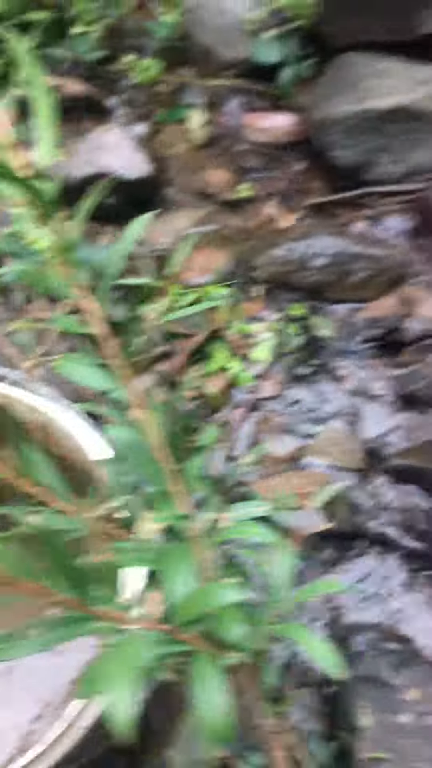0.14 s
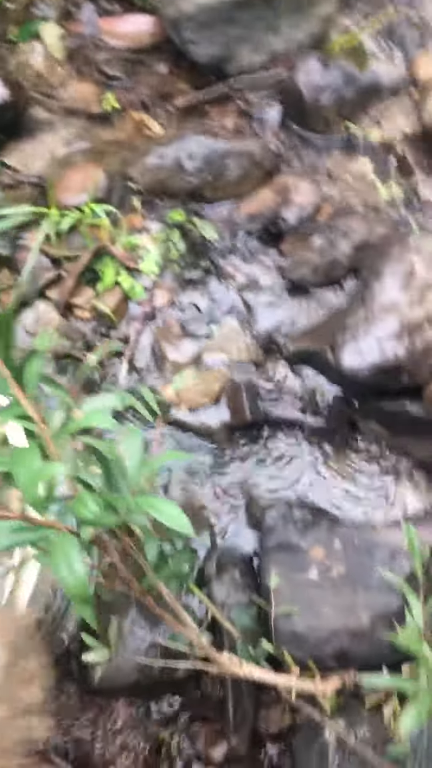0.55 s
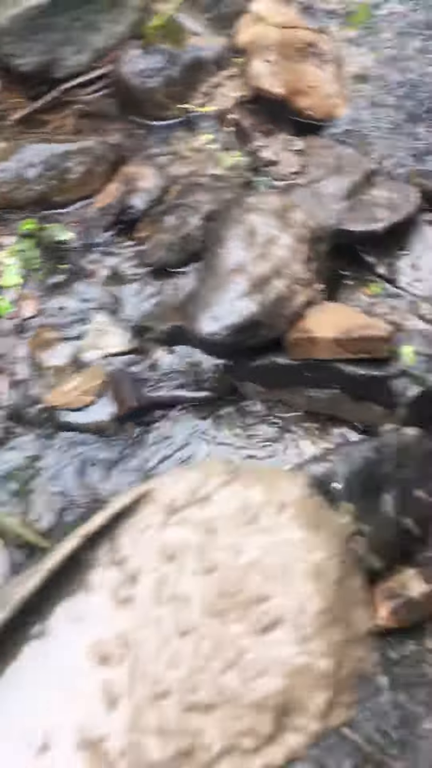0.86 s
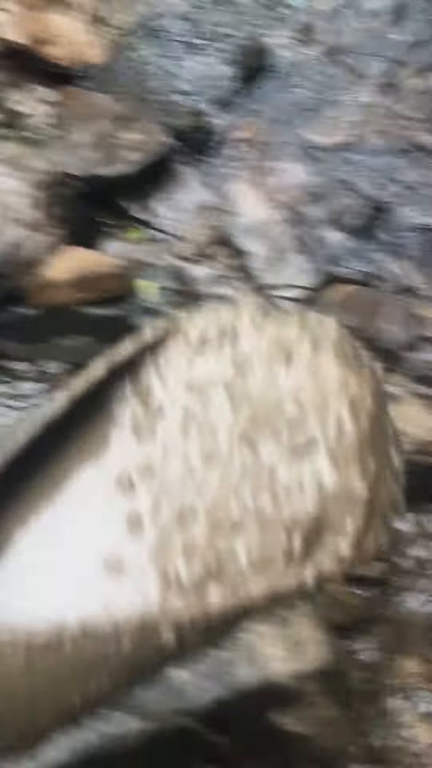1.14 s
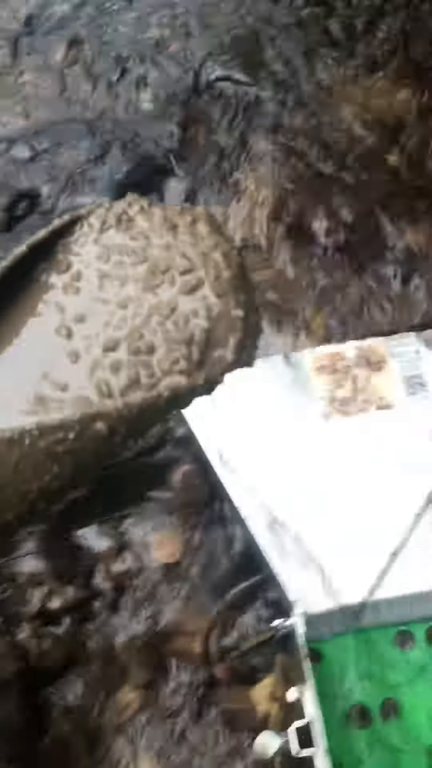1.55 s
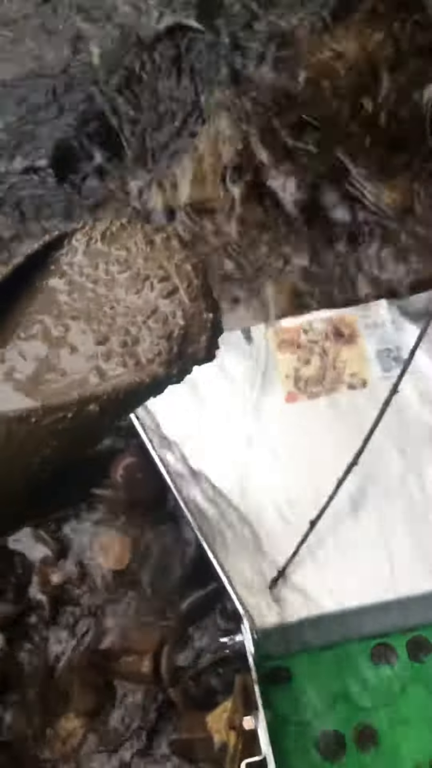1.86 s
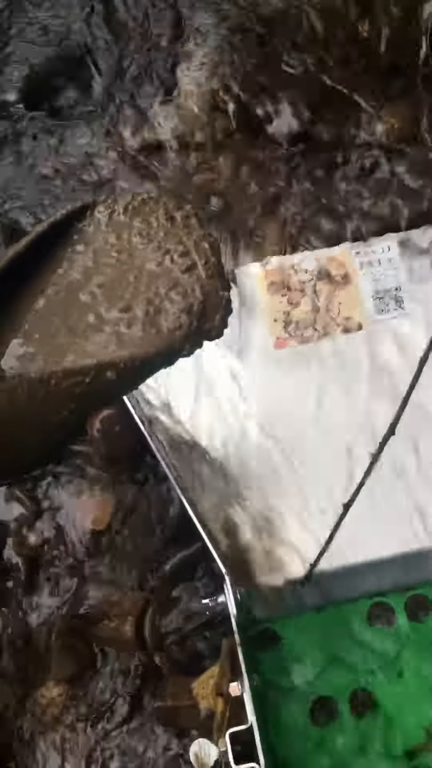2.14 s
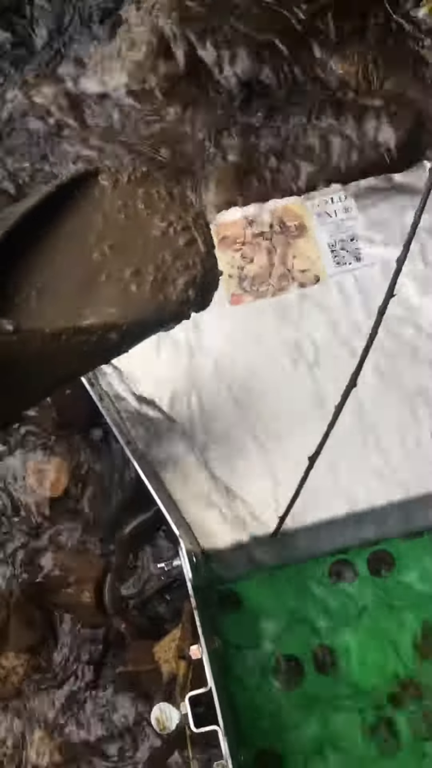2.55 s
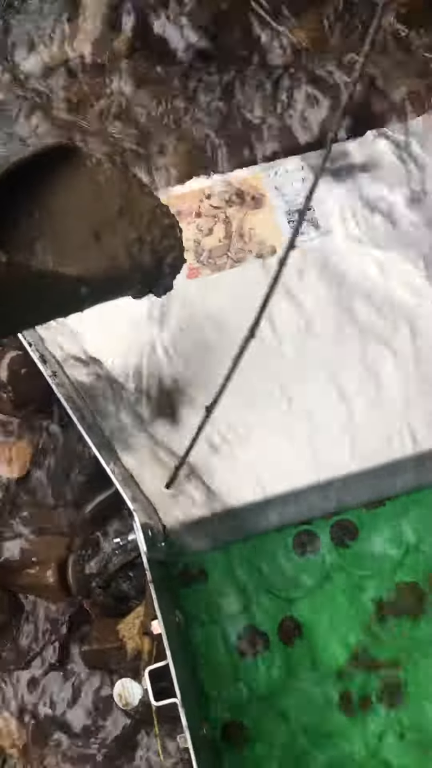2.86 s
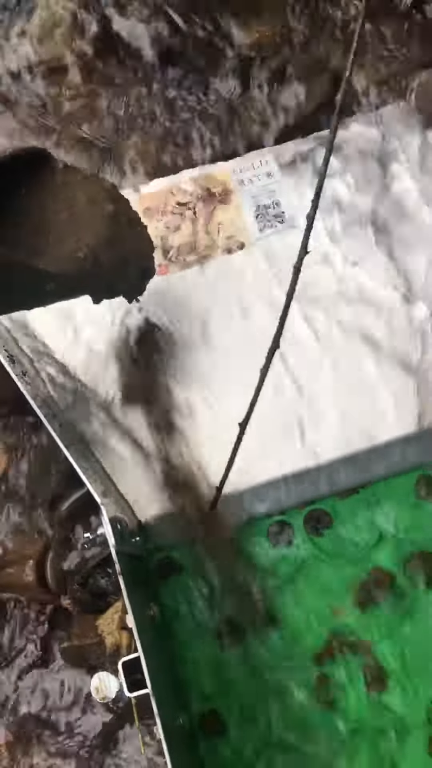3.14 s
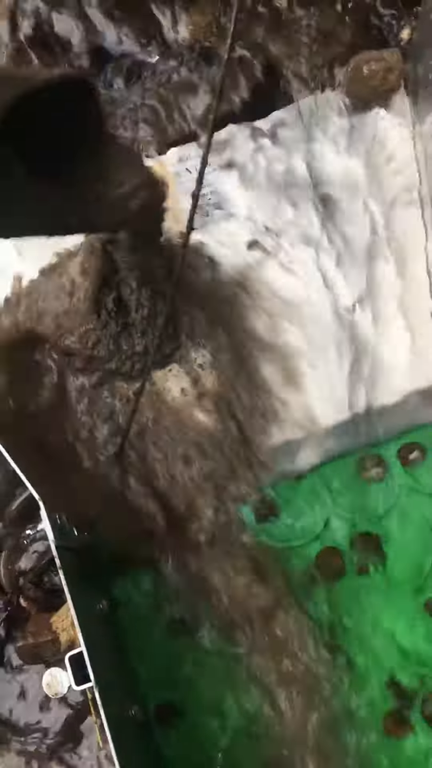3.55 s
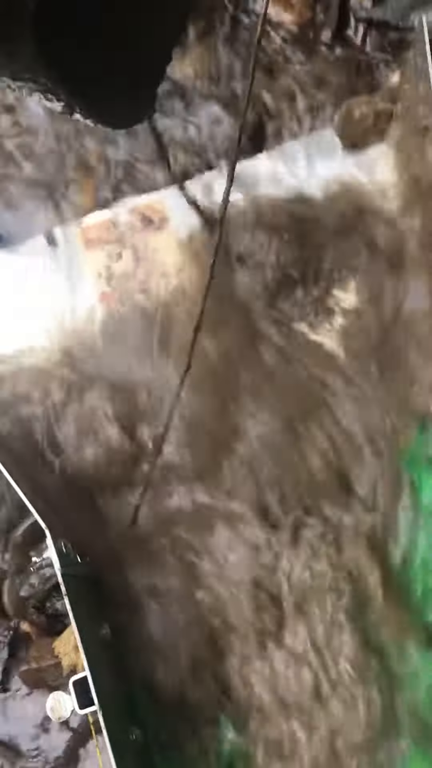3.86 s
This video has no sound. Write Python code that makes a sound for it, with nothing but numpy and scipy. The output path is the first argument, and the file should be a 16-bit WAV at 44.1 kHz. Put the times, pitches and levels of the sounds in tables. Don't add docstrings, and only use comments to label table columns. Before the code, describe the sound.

Close outdoor stream, hissing and gurgling with small splashes, swells gently and drums softly on sheet metal, then two wet loads of mud and grit land in the last half second, heard on a phone.

```python
import sys
import numpy as np
from scipy import signal
from scipy.fft import rfft, irfft, next_fast_len
from scipy.io import wavfile
from scipy.ndimage import uniform_filter1d, map_coordinates

SR = 44100
rng = np.random.default_rng(int(sys.argv[2]) if len(sys.argv) > 2 else 0)


def ratio_of_db(decibels):
    return 10 ** (np.asarray(decibels, float) / 20)


def materialize(psi):
    bounded = np.clip(np.atleast_2d(psi).T, -1, 1)
    quanta = np.round(bounded * 32767).astype(np.int16)
    wavfile.write(sys.argv[1], SR, quanta)


N = 176400

# (time [s], level [dB])
CLOSENESS = [
    (0, -49),
    (.8, -47.5),
    (2, -45),
    (3.2, -45),
    (4, -44.5),
]
# (time [s], level [dB])
POUR_STRENGTH = [
    (3.0, -42),
    (3.4, -42),
    (3.48, -31),
    (3.58, -38),
    (3.765, -41.5),
    (3.79, -34),
    (3.89, -33.5),
    (3.91, -41),
    (4, -36.5),
]
# (time [s], peak level [dB], brightness [Hz])
SPLASHES = [(0.0258, -29, 14500), (0.0752, -29, 7780), (0.2104, -21, 6590), (0.2528, -32, 11800),
            (0.3296, -28, 6360), (0.5043, -27, 15400), (0.5237, -29, 14600), (0.5442, -29, 11800),
            (0.611, -26, 9420), (0.621, -27, 14600), (0.7662, -30, 14800), (0.7916, -27, 6420),
            (0.8155, -9, 15300), (0.9183, -26, 12500), (0.9308, -21, 10000), (1.0735, -23, 12100),
            (1.2945, -28, 11400), (1.3099, -29, 8770), (1.3254, -23, 9660), (1.4576, -28, 8590),
            (1.4955, -25, 9150), (1.5549, -27, 12600), (1.6117, -25, 9380), (1.6272, -16, 14900),
            (1.6781, -25, 9740), (1.7674, -23, 12500), (1.8058, -26, 13100), (1.8337, -18, 13800),
            (1.8547, -25, 11300), (1.8866, -25, 12700), (2.0842, -24, 14700), (2.1545, -26, 14500),
            (2.176, -22, 14200), (2.2323, -24, 6730), (2.2488, -24, 14700), (2.3356, -26, 15100),
            (2.4917, -24, 15300), (2.5421, -27, 13100), (2.5701, -18, 15000), (2.605, -23, 8700),
            (2.6254, -16, 11000), (2.6813, -23, 8810), (2.6993, -25, 8820), (2.7222, -22, 15400),
            (2.7666, -22, 14800), (2.9248, -19, 11100), (2.9791, -25, 13500), (3.0799, -27, 14600),
            (3.1273, -21, 14700), (3.1434, -19, 14100), (3.2625, -21, 15100), (3.3009, -23, 9920),
            (3.3374, -18, 15300), (3.3667, -21, 11400)]
# (time [s], peak level [dB], brightness [Hz])
SPRAYS = [(1.3394, -31, 11000), (3.1931, -18, 9910), (3.2161, -25, 12200), (3.2331, -24, 8140),
          (3.3433, -18, 10900), (3.4316, -21, 10800), (3.5394, -15, 12900), (3.8053, -13, 9510),
          (3.8174, -14, 12500), (3.8754, -15, 8590), (3.8884, -15, 9280), (3.931, -15, 12800)]
# (time [s], peak level [dB], brightness [Hz])
SLAPS = [
    (0.212, -24.5, 1540),
    (0.254, -26, 1220),
    (1.556, -23, 2970),
    (3.504, -15, 1090),
    (3.858, -42, 2840),
]
# (time [s], peak level [dB], brightness [Hz])
GRIT = [(3.4725, -16, 14300), (3.5039, -7, 6680), (3.5804, -24, 14800), (3.5987, -21, 14300),
        (3.6097, -18, 6680), (3.6386, -25, 8440), (3.6591, -21, 15000), (3.7074, -19, 14000),
        (3.7299, -21, 14400), (3.7798, -3, 11400), (3.7874, -13, 9000), (3.8521, -14, 15000),
        (3.8676, -11, 12500), (3.9414, -21, 11100), (3.9494, -23, 14100), (3.9659, -17, 13700),
        (3.9853, -16, 14100)]
# (time [s], peak level [dB], pitch [Hz])
BUBBLES = [(0.214, -27, 1444), (0.254, -36.5, 1286), (0.372, -29, 2110), (0.436, -37, 1310),
           (0.459, -34, 1234), (0.679, -31.5, 2430), (0.818, -32, 1910), (0.875, -29, 3900),
           (0.916, -35, 2600), (0.961, -32, 3250), (1.3, -37, 815), (1.421, -31.5, 2340),
           (1.555, -33, 2380), (1.684, -34.5, 4100), (1.818, -36, 1110), (1.858, -38, 970),
           (2.047, -31, 2870), (2.135, -53, 1770), (2.26, -33, 980), (2.342, -29.5, 1424),
           (2.395, -33.5, 1080)]
# (time [s], peak level [dB], pitch [Hz])
LATE_BUBBLES = [(2.637, -28.5, 2700), (2.667, -34, 1340), (2.7, -35, 1020), (2.724, -28.5, 1445),
                (2.772, -34, 1046), (2.915, -30.5, 2180), (2.979, -37, 1350), (2.997, -30, 1083),
                (3.046, -32, 1520), (3.181, -30.5, 3640), (3.321, -28, 2260), (3.364, -28.5, 3400),
                (3.447, -37, 980), (3.475, -34, 2620), (3.494, -15.5, 2130), (3.625, -35, 1080),
                (3.712, -24, 2640), (3.967, -26, 2190)]
# (time [s], peak level [dB], pitch [Hz])
GURGLES = [(0.584, -40, 738), (0.879, -38, 1410), (1.267, -36, 1730), (1.332, -38, 1290),
           (1.715, -36, 1280), (2.031, -37, 1070), (2.07, -37, 1430), (2.19, -37, 1520), (2.926, -34, 1490),
           (3.205, -34, 1420), (3.275, -35, 1430), (3.658, -34, 1900), (3.854, -30, 1980)]
# (time [s], peak level [dB], pitch [Hz])
PLINKS = [(0.0483, -37, 3290), (0.1411, -38, 3640), (0.1595, -32, 5880), (0.2907, -35, 4610),
          (0.5237, -36, 4610), (0.7158, -35, 4170), (1.0635, -36, 2950), (1.1393, -36, 3570),
          (1.3194, -34, 3290), (1.7135, -35, 5800), (2.1929, -32, 6340), (2.3007, -33, 4240),
          (2.5247, -36, 3100), (2.6983, -30, 4010), (2.7192, -28, 5140), (2.7676, -34, 5680),
          (2.806, -32, 3220), (2.837, -32, 4680), (2.9253, -30, 3660), (2.9577, -31, 3450),
          (3.0804, -29, 3630), (3.1278, -34, 5120), (3.9964, -23, 3810)]
# (time [s], peak level [dB], pitch [Hz])
KNOCKS = [(1.502, -40, 456), (1.857, -37, 460), (2.417, -35.5, 502), (2.823, -36, 510), (3.21, -35.5, 511),
          (3.241, -31, 482), (3.339, -36.5, 460), (3.506, -30.5, 434), (3.564, -35, 390),
          (3.706, -34.5, 248), (3.71, -38, 385), (3.784, -28, 242), (3.79, -36, 364), (3.847, -34, 257)]
# (frequency [Hz], level per Hz [dB])
HISS_COLOUR = [(180, -16), (300, -2.5), (522, 0.5), (700, -3), (2320, -8), (5020, -7.5), (14700, -9),
               (15700, 0.5), (16500, -55)]
# (frequency [Hz], level per Hz [dB])
MUD_COLOUR = [(180, -61), (300, -24), (386, -9), (2740, -2), (4850, -6.5), (14700, -2), (15700, -6),
              (16500, -31)]
# (frequency [Hz], level per Hz [dB])
RUMBLE_COLOUR = [(12, -50), (20, -26), (32, -12.5), (75, -0.5), (92, 0), (113, -11.5), (200, -12),
                 (260, -23), (440, -120)]
# (frequency [Hz], width [Hz], level [dB])
PLATE_TONES = [(238, 48, 0), (505, 85, 0)]
# (frequency [Hz], time to fade 60 dB [s])
BANK_FADE = [(300, 0.08), (3000, 0.08), (12000, 0.007)]
# (frequency [Hz], width [Hz], depth [0-1])
CASE_DIPS = [(4930, 264, 0.37), (10420, 220, 0.68)]


def unit(x):
    return x / np.sqrt(np.mean(x ** 2) + 1e-20)


def along(points, hz):
    f, value = np.transpose(points)
    return np.interp(np.log(hz + 1), np.log(f + 1), value)


def curve(rows):
    return np.interp(np.arange(N) / SR, *np.transpose(rows))


def wobble(rate):
    return map_coordinates(rng.standard_normal(N // 100), [np.arange(N) * rate / SR])


def filtered(x, response):
    size = next_fast_len(len(x) + 4096)
    hz = np.fft.rfftfreq(size, 1 / SR)
    return irfft(rfft(x, size) * response(hz), size)[:len(x)]


def peak(f, hz, width):
    return 1j * f * width / (hz * hz - f * f + 1j * f * width)


def rush(spectrum, patchy_db):
    z = signal.stft(rng.standard_normal(N), nperseg=256)[2]
    patches = uniform_filter1d(rng.standard_normal(z.shape), 8, 0)
    patches = unit(uniform_filter1d(patches, 5, 1))
    x = signal.istft(z * ratio_of_db(patchy_db * patches), nperseg=256)[1][:N]
    return unit(filtered(x, lambda hz: ratio_of_db(along(spectrum, hz))))


def rings(s, gain, hz, cycles, rise, soft, size):
    life = np.arange(size) / SR * (hz / cycles)[:, None]
    turns = np.reshape(cycles, (-1, 1)) * life * (1 + rise * life)
    wave = np.sin(2 * np.pi * turns) * ratio_of_db(-60 * life) * (1 - np.exp(-life / soft))
    wave *= (gain / np.abs(wave).max(1))[:, None]
    at = np.round(s * SR).astype(int)[:, None] + np.arange(size)
    return np.bincount(at.ravel(), wave.ravel(), N + SR)[:N]


def swarm(hz, octaves, cycles, spread_db, rise, soft, clump_db, count, size, around=None):
    r = rng.random((count, 3))
    pitch = np.clip(hz * 2 ** (octaves * rng.standard_normal(count)), hz / 2.6, 15500)
    s = r[:, 0] * (N - 1) / SR
    clump = np.clip(wobble(40), -2, 2)[(s * SR).astype(int)]
    db = -spread_db * np.log(r[:, 1] + .03) + clump_db * clump
    if around:
        at = np.array(around)[(r[:, 2] * len(around)).astype(int), 0]
        s = at + 0.012 * (rng.gamma(2, size=count) - 1.5)
    return unit(rings(s, ratio_of_db(db), pitch, cycles * (0.75 + r[:, 2]), rise, soft, size))


def bursts(rows, head_s, tail_s, tail_db, width, wide_db, gain_db):
    lag_s = .0007
    out, t = np.zeros(N + SR), np.arange(SR // 16) / SR
    shape = ratio_of_db(-60 * t / head_s) + ratio_of_db(tail_db - 60 * t / tail_s)
    shape *= np.minimum(1, t / 0.00016)
    for s, db, hz in rows:
        def colour(f):
            wide = peak(f, min(1.92 * hz, 14000), hz) ** 2
            return peak(f, hz, width * hz) ** 2 + ratio_of_db(wide_db) * wide
        one = filtered(shape * rng.standard_normal(len(t)), colour)
        start = round((s + lag_s) * SR)
        out[start:start + len(t)] += ratio_of_db(db + gain_db) * one / np.abs(one).max()
    return out[:N]


def plate(gains_db):
    total = 0
    for (hz, width, db), gain_db in zip(PLATE_TONES, gains_db):
        tone = unit(filtered(rng.standard_normal(N), lambda f: peak(f, hz, width) ** 2))
        total = total + ratio_of_db(gain_db + db) * tone
    return total


def stream():
    hiss = ratio_of_db(1.3 * wobble(12) + 1.8 * wobble(40)) * rush(HISS_COLOUR, patchy_db=2.8)
    glug = swarm(762, 0.411, 33.0, spread_db=3.5, rise=0.25, soft=0.045, clump_db=6.5, count=800, size=2000)
    gurgle = swarm(1900, .6, 44, spread_db=3.6, rise=.1, soft=.04, clump_db=2.8, count=3600, size=1200)
    fizz = swarm(4300, .55, 30, spread_db=5, rise=.08, soft=.06, clump_db=3.5, count=5000, size=400)
    ticks = swarm(12500, .4, 12, spread_db=5, rise=.05, soft=.045, clump_db=3.5, count=6000, size=120)
    over_sluice_s = 0.82
    away_db = -9 * np.clip((over_sluice_s - np.arange(N) / SR) / 0.29, 0, 1)
    low_db = -16.5 + 0.052 * away_db + 2.0 * wobble(15)
    high_db = -12.0 + away_db + 2.5 * wobble(25.54)
    drum = plate([low_db, high_db])
    water = ratio_of_db(-6.5) * hiss + ratio_of_db(-13.0) * glug + ratio_of_db(-1) * gurgle + ratio_of_db(-7) * fizz + ratio_of_db(-4.5) * ticks
    rumble = rush(RUMBLE_COLOUR + [(260, -40), (400, -120)], patchy_db=1.0)
    return ratio_of_db(curve(CLOSENESS)) * (water + drum) + ratio_of_db(-60) * rumble


def drops():
    s, db, hz = np.transpose(BUBBLES + LATE_BUBBLES + GURGLES + PLINKS)
    bubbles = rings(s, ratio_of_db(db - 1.5), hz * .98, 34, rise=.1, soft=.06, size=2500)
    spray = swarm(11500, .45, 13, spread_db=3.5, rise=.05, soft=.04, clump_db=1, count=900, size=120,
                  around=SPLASHES)
    babble = swarm(1500, .45, 30, spread_db=3, rise=.1, soft=.08, clump_db=1, count=300, size=1500,
                   around=BUBBLES + LATE_BUBBLES[:13])
    splashes = bursts(SPLASHES, 0.0029, 0.019, -6, 0.76, -5.5, 0.44)
    sheets = bursts(SPRAYS, 0.0021, 0.04, 5.7, 1.07, -23, -0.047)
    slaps = bursts(SLAPS, 0.0029, 0.026, 2, 1.1, -5.3, -2.4)
    return splashes + sheets + ratio_of_db(-62.0) * spray + ratio_of_db(-64) * babble + slaps + bubbles


def banks(x):
    hz, t, z = signal.stft(rng.standard_normal(SR // 5), SR, nperseg=128)
    fade = ratio_of_db(-60 * t / along(BANK_FADE, hz)[:, None])
    tail = signal.istft(z * fade, SR, nperseg=128)[1]
    return signal.fftconvolve(np.pad(x, (90, 0)), tail / np.linalg.norm(tail))[:N]


def pour():
    s, db, hz = np.transpose(KNOCKS)
    boom = rings(s, ratio_of_db(db - 4.5), hz, 27.3, rise=0.0088, soft=0.032, size=7000)
    onset = np.clip((np.arange(N) / SR - 2.95) / 0.93, 0, 1)
    mud = rush(MUD_COLOUR + [(17000, -120)], patchy_db=3.0)
    sheet = ratio_of_db(1.6 + 1.8 * wobble(100)) * mud
    spatter = swarm(12000, .45, 12, spread_db=6, rise=.05, soft=.05, clump_db=2.5, count=5000, size=120)
    drum = plate([-17 + 3 * wobble(30), -32])
    cracks = bursts(GRIT, 0.0062, 0.019, -5, 0.83, -1, .3)
    grit = swarm(11500, .45, 12, spread_db=4, rise=.05, soft=.04, clump_db=1, count=500, size=120, around=GRIT)
    flow = onset * ratio_of_db(curve(POUR_STRENGTH)) * (sheet + ratio_of_db(-3.5) * spatter + drum)
    return flow + cracks + ratio_of_db(-56.0) * grit + boom


def scene():
    close = drops() + pour()
    return (stream() + close + ratio_of_db(-13) * banks(close))[None]


def roll_off(x):
    return signal.sosfilt(signal.butter(12, 15850, fs=SR, output="sos"), x)


def record(dry):
    def case(f):
        dips = sum(np.clip(depth, 0, .8) * peak(f, hz, width) for hz, width, depth in CASE_DIPS)
        return (1 - dips) * np.where(f < 16800, 1, ratio_of_db(-60))
    return roll_off(filtered(dry[0], case)[None])


dry = scene()
out = record(dry)
materialize(out)
```